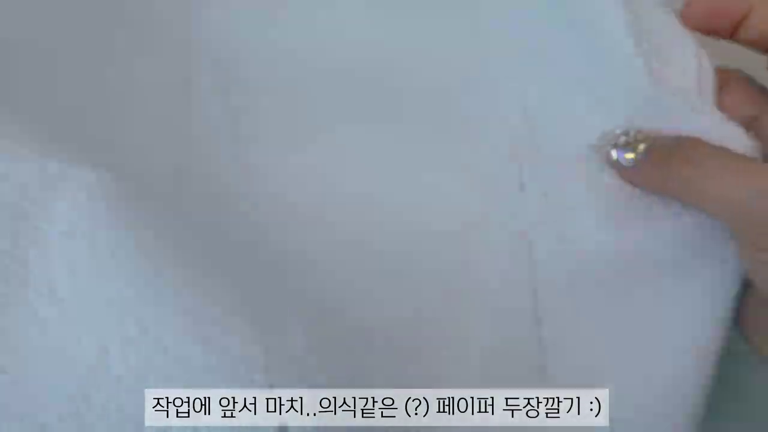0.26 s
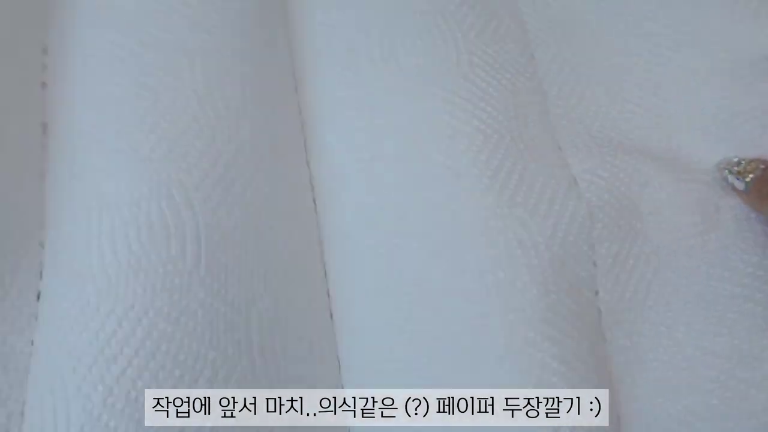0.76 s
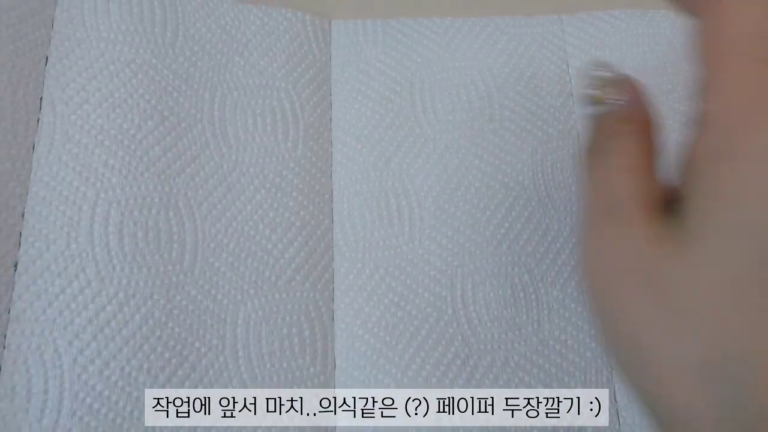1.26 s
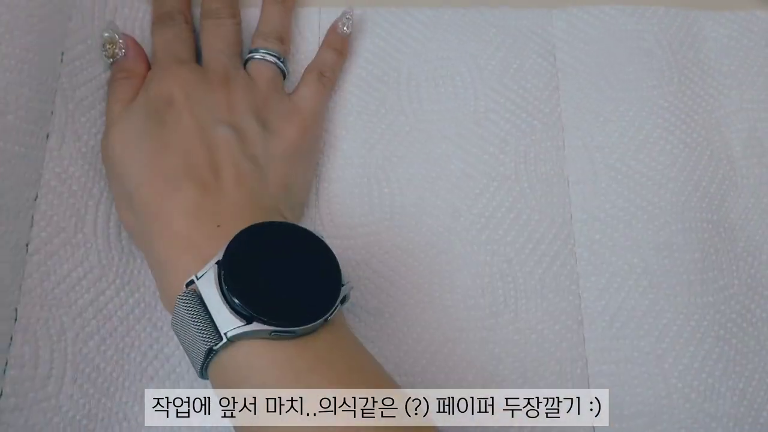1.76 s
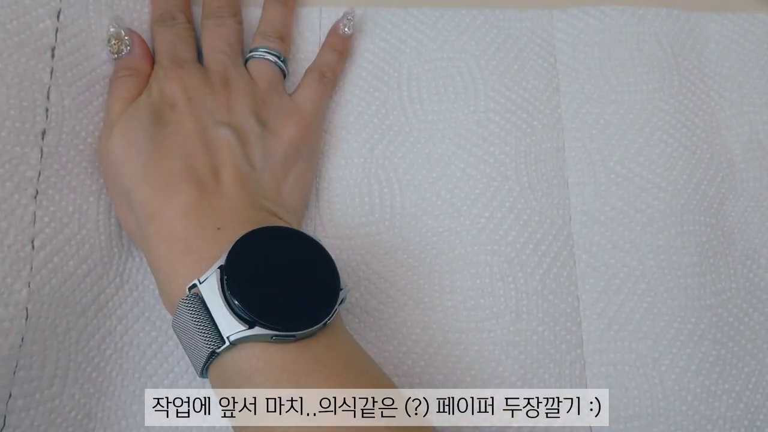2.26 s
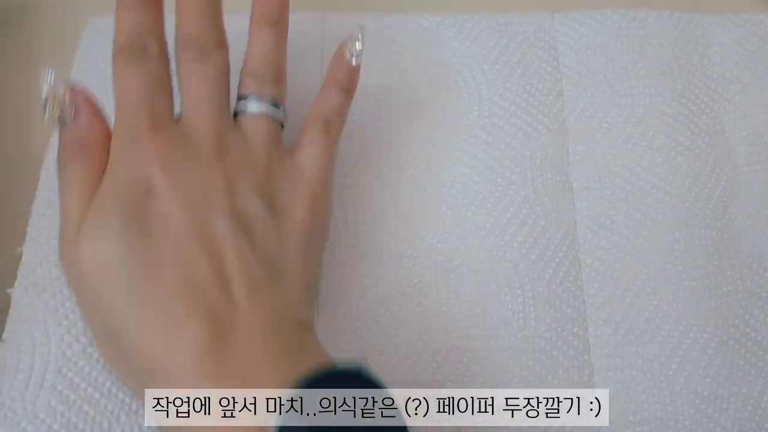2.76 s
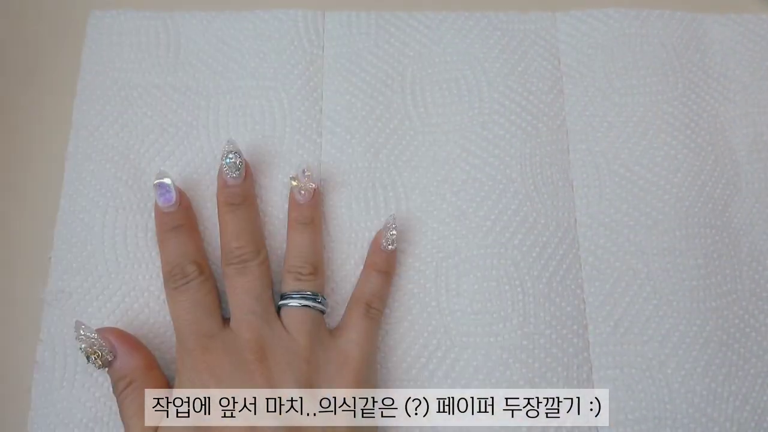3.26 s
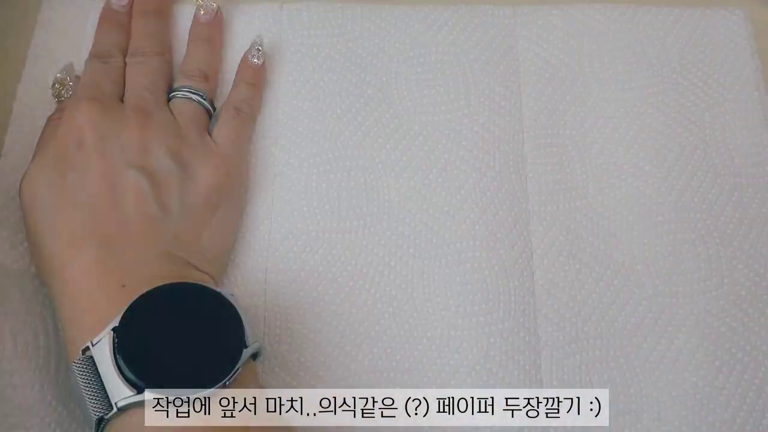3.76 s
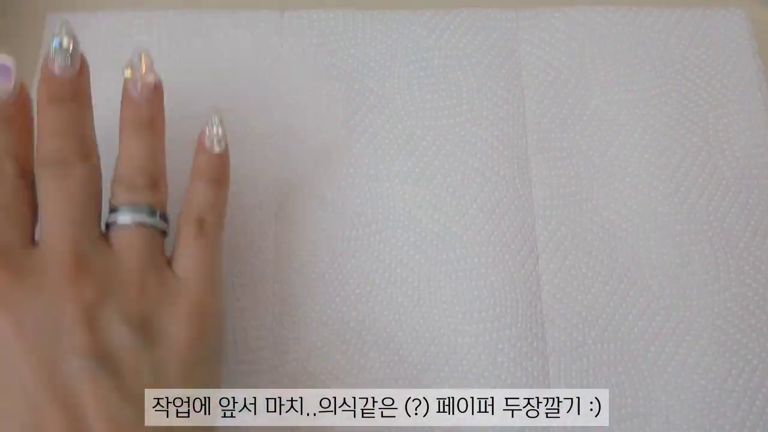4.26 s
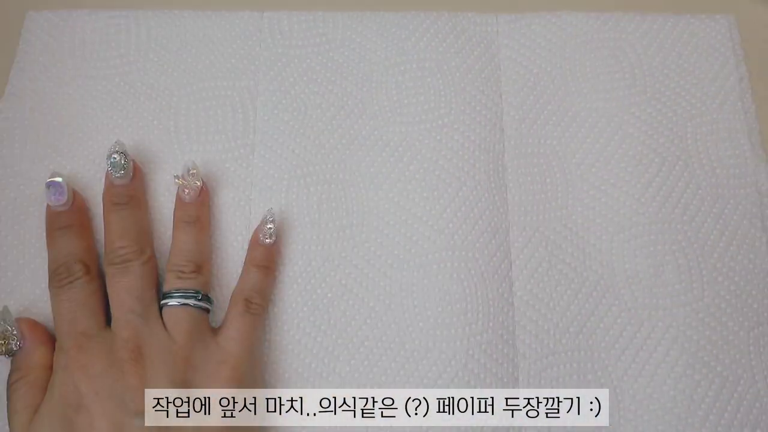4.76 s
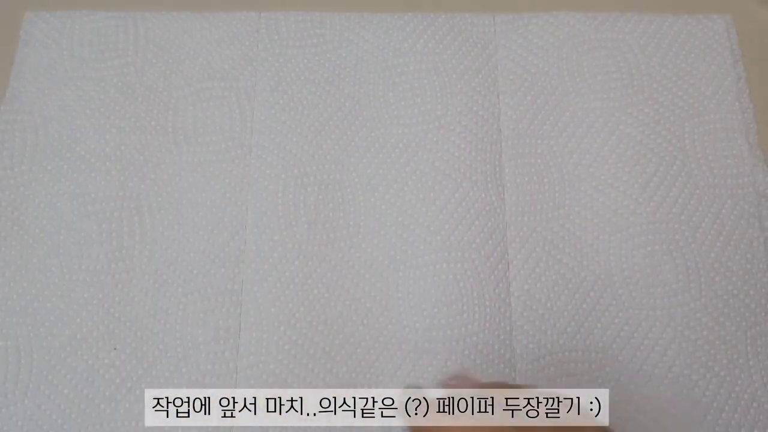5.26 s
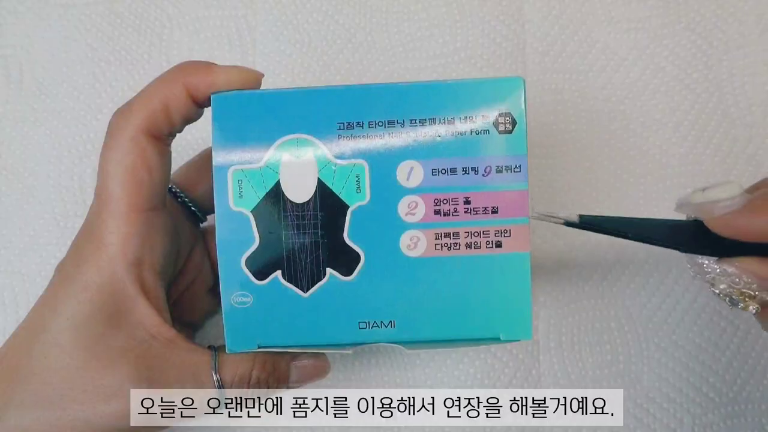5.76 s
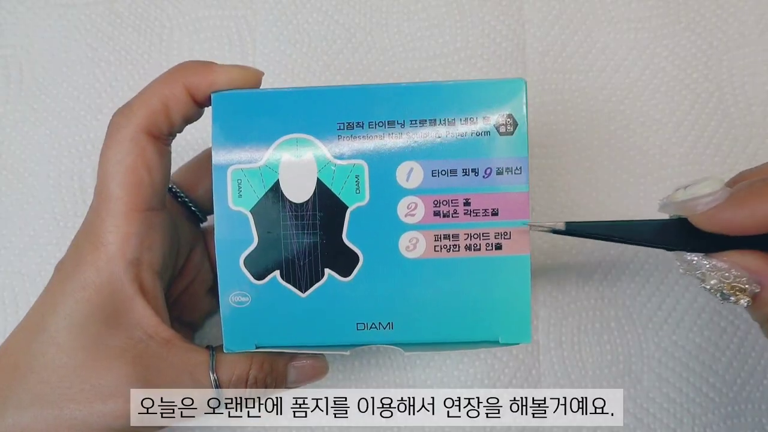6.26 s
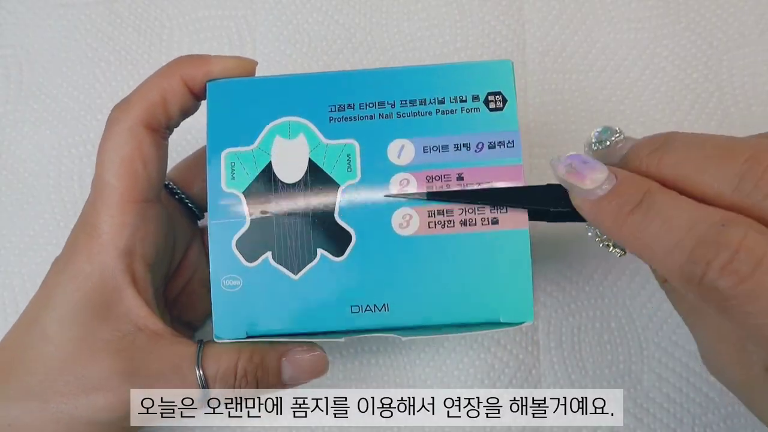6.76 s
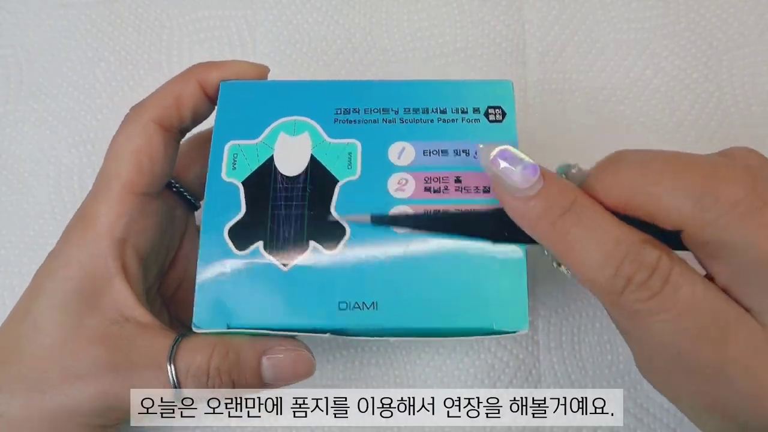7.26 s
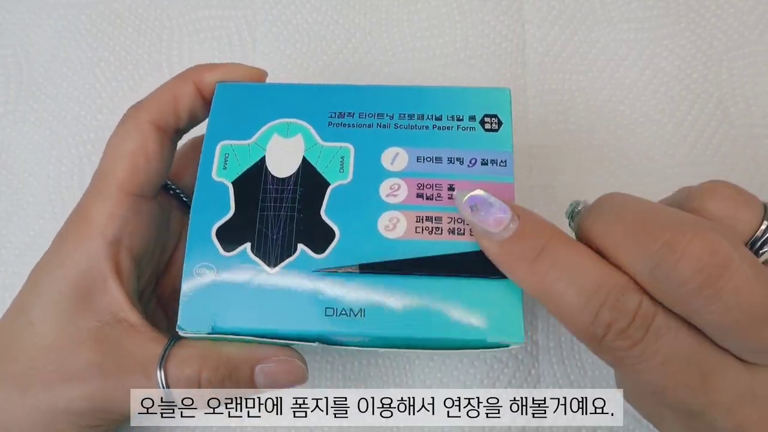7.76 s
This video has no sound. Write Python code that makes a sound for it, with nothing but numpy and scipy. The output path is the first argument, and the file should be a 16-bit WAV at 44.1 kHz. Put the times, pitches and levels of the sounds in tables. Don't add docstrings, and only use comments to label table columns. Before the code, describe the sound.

Very close to the microphone, embossed paper towel rustles and slides, quietens, then crackles in a rapid burst of snaps. Smaller snaps, a palm thump and a cluster of nail pats on the desk follow. After a near-silent gap, steel tweezers tap and scratch a hollow cardboard box, ending with its flap sliding. Small quiet room, short echoes, faint hiss.

```python
import sys
import numpy as np
from scipy import signal
from scipy.fft import rfft, irfft, next_fast_len
from scipy.io import wavfile
from scipy.ndimage import uniform_filter1d, map_coordinates

SR = 44100
rng = np.random.default_rng(int(sys.argv[2]) if len(sys.argv) > 2 else 0)


def generate_wav(sig):
    pcm = np.round(np.clip(np.atleast_2d(sig).T, -1, 1) * 32767).astype(np.int16)
    wavfile.write(sys.argv[1], SR, pcm)


def to_linear_factor(level_db):
    exponent = np.asarray(level_db, float) / 20
    return 10 ** exponent


N = 353241
TIME = np.arange(N) / SR

# f/Hz, level/dB per Hz
AIR = [(88, -61), (150, -5), (566, -9), (730, -5), (905, -8.5), (4000, -18), (13700, -24), (16000, -37)]
AIR_DB = -66.5
ROOM_T60_S, ROOM_DB = 0.31, -19
ALIKE = [.998, .91, .78, .2]
# t/s, left minus right level/dB
PAN = [(0.0, -3.5), (0.54, 1), (0.94, 9), (1.3, -2), (1.52, 6.5), (2.12, 10), (2.52, 4.5), (5.55, 7.5),
       (5.78, -1), (7.05, -3.5), (7.45, -2), (8.01, -0.5)]
# t/s, lead/samples
LEAD = [(0, -1), (1.2, -2), (1.6, 2), (5.3, 2), (5.9, 0), (8.01, 0)]

# start t/s, length/s, first level/dB, last level/dB, brightness/dB
SLIDES = [(0, 0.16, -33.5, -39.5, -1), (.105, 0.031, -33, -33, 0), (.145, 0.079, -37, -36.5, -1.5),
          (.24, 0.16, -37, -38, -0.5), (.425, 0.13, -30, -30.5, 2), (.47, 0.04, -35.5, -29, 0.5),
          (.56, 0.057, -36.5, -40.5, -0.5), (.63, 0.12, -33, -42.5, 0.2), (.76, 0.082, -38, -37, -1.5),
          (.85, 0.057, -38.5, -41.5, 1), (.915, 0.053, -39.5, -44, -0.5), (.985, 0.34, -48.5, -51, -2.5),
          (1.42, 0.14, -57.5, -49, 1), (1.575, 0.075, -55, -59, 5), (1.72, 0.057, -71.5, -57.5, 2.5),
          (1.915, 0.11, -48.5, -41.5, 1), (2.04, 0.14, -46, -45.5, 1), (2.19, 0.092, -55, -59, 3),
          (2.48, 0.067, -71, -58.5, -1.7), (3.68, 0.11, -55, -41, -1), (3.87, 0.044, -41, -44, 0),
          (4.48, 0.08, -65, -41.5, 3.5), (4.94, 0.12, -58, -63.5, 1.3), (5.362, .04, -52.5, -42.5, 4.5),
          (5.41, 0.07, -41, -43.5, 7.5), (5.5, 0.12, -54.5, -71, 8)]
# start t/s, length/s, first level/dB, last level/dB
SETTLES = [(2.28, 0.17, -61, -57), (2.565, 0.066, -22.5, -26.5), (2.74, 0.12, -40.5, -47),
           (2.92, 0.13, -49.5, -52.5), (3.115, 0.13, -41, -47), (3.236, 0.0055, -30, -33.5),
           (3.25, 0.14, -40, -47), (3.41, 0.065, -42, -51), (3.52, 0.43, -51.5, -58.5),
           (3.9, 0.17, -37, -59.5), (4.59, 0.06, -43, -59.5), (4.68, 0.097, -46.5, -64),
           (4.79, 0.14, -46, -68)]
# start t/s, length/s, first level/dB, last level/dB
FLICK = [
    (1.24, 0.02, -46, -29),
]
# t/s, peak level/dB, desk knock against peak/dB, brightness/dB, knock f/Hz
SNAPS = [(2.5433, -15.5, -8.5, 1, 1180), (2.5551, -6.5, -9, -18.5, 1000), (2.5614, -11, 3.5, 1.5, 490),
         (2.5714, -17.5, -17.5, 4, 1200), (2.5782, -14, 2.5, -7, 730), (2.6297, -16, 1, -1, 526),
         (2.6389, -9.5, 4.5, -3.5, 1040), (2.6682, -11.5, -9.5, -3, 1250), (2.6861, -19, 6.5, 2, 710),
         (2.7058, -15, 2, -3, 710), (2.7224, -20, 3, -19.5, 839), (3.2135, -9, -9, -12.5, 1210),
         (3.2303, -10.5, -13.5, -12.5, 850), (3.237, -19.5, -2.5, 1.5, 816), (3.7534, -25.5, -29, -3, 847),
         (3.7708, -21.5, -12, -2, 1190), (3.8043, -17, -6.5, -4.5, 790), (3.8448, -19, 1.5, 4.5, 1209),
         (3.8616, -13.5, 1.5, 3, 438), (3.8715, -13.5, 1.5, -0.5, 557), (3.8916, -21.5, 4.5, -5, 720)]
# t/s, peak level/dB, desk knock against peak/dB, brightness/dB, knock f/Hz
PATS = [(.625, -22.5, -12, -14, 1070), (2.9135, -39.5, 5, -27, 550), (3.109, -28, 6, -6, 438.8),
        (3.1287, -37.5, -25, 2, 649.3), (3.2897, -28, -8, -1.5, 400), (3.3431, -36, 0.5, -6, 640),
        (4.5693, -22.5, -2, -9.5, 462), (4.584, -12, -8, -29.5, 580), (4.6651, -9.5, -11, -49.5, 650),
        (4.7109, -12, -5.5, -23.5, 460), (4.7655, -18, -7, -19.5, 437), (4.7718, -18, -3, -7, 450),
        (4.7893, -30.5, -16, -2, 529)]
# t/s, peak level/dB, f/Hz
CREASES = [
    (0.2257, -23.5, 860),
    (0.832, -27, 604.8),
    (1.0283, -32.5, 1024),
    (2.2615, -46, 794),
    (2.3328, -48, 985),
    (2.435, -45.5, 1082),
]
# t/s, pitch ratio
TENSION = [(0, 1.014), (.6, 1.053), (.74, 0.81), (0.859, 0.72), (0.919, 0.87), (1.2, 1.07), (1.499, 1.04),
           (2.001, 0.9), (2.5, 1.03)]
# f/Hz, width/Hz, level/dB
SHEET = [
    [(520, 560, 0), (734, 200, 7), (1100, 300, 4)],
    [(1460, 890, 8), (2280, 1300, 8.5)],
    [(3300, 850, 4.5), (4400, 770, 4)],
    [(7000, 17000, 10.5), (10230, 7100, -4), (14290, 2400, -6.5)],
]
# f/Hz, width/Hz, level/dB
DESK = [
    [(450, 303, 0.0031), (672.6, 35, 0.0023)],
    [(1210, 500, 1), (1750, 830, -2.5)],
    [(2680, 1300, 4.6), (5000, 1500, 5)],
    [(6730, 16000, -0.67), (11600, 1000, -1.4)],
]

# start t/s, length/s, first level/dB, last level/dB, brightness/dB
LEANS = [(0, 0.28, -50, -56, 2), (.42, 1.01, -51.5, -57, 1), (1.7, 1.1, -54, -55.5, 2.5),
         (2.55, 0.26, -42, -61, 2), (3.11, 0.4, -49, -55.5, 6), (3.28, 0.54, -58.5, -55, -2.5),
         (3.8, 0.21, -49.5, -51.5, 1.5), (4.05, 0.49, -75.5, -63.5, 0.5), (4.56, 0.17, -55, -44.5, 3),
         (4.9, 0.38, -66, -69, -4.5), (5.3, 0.46, -53.5, -56.5, -5.5), (5.85, 0.34, -62, -74, -3),
         (6.3, 1.3, -70.5, -58, 1.5), (7.4, 0.82, -60.5, -59, 1)]
# start t/s, length/s, first level/dB, last level/dB
DRUMS = [
    (.46, 0.048, -68, -49),
    (1.25, 0.074, -54, -42),
    (1.85, 0.069, -58.5, -48),
    (6.43, 0.13, -61, -56.5),
    (7.53, 0.053, -50, -49),
]
# t/s, peak level/dB, f/Hz, ring/s
LANDINGS = [
    (3.106, -36, 317, 0.023),
    (3.118, -22.5, 63.7, 0.012),
    (3.12, -32, 205, .04),
    (3.135, -41.5, 305, 0.033),
    (3.41, -39, 265, 0.011),
    (3.417, -32, 139.3, 0.012),
    (3.869, -32.5, 307.6, 0.013),
    (4.576, -33, 206, 0.023),
    (7.236, -41.5, 239, 0.018),
    (7.531, -31, 228, 0.012),
]

# start t/s, length/s, first level/dB, last level/dB, brightness/dB
PULLS = [
    (1.48, 0.042, -55, -54, -14),
    (3.52, 0.058, -54, -55, -4.5),
    (3.6, 0.16, -55.5, -47, -13.5),
    (3.92, 0.046, -41, -52, -14.5),
    (3.415, 0.021, -51, -58, -3),
    (4.59, 0.044, -52, -49, -14),
    (4.675, 0.029, -51, -50, -22),
    (4.72, 0.033, -37.5, -52, -17),
]
# start t/s, length/s, first level/dB, last level/dB
BRUSHES = [
    (3.97, 0.039, -50, -51),
    (4.19, 0.058, -72.5, -71),
    (4.245, 0.014, -62, -66),
    (4.29, 0.012, -63.5, -75),
]
# t/s, peak level/dB, f/Hz, ring/s
PINGS = [(.833, -30.5, 3200, .004), (.836, -26.5, 584, 0.0049), (1.028, -32, 2470, .002),
         (2.5565, -20, 2384, 0.00054), (2.5705, -14.5, 2340, 0.0014), (2.6682, -7, 1189, 0.0019),
         (2.7058, -7.5, 990, 0.0024), (2.7224, -10.5, 1130, 0.002), (3.1083, -33, 3165, 0.0018),
         (3.1283, -31, 3970, 0.0015), (3.1752, -35.5, 2500, .002), (3.2295, -18, 1767, 0.0014),
         (3.2894, -29, 3120, 0.0038), (3.3473, -35, 2760, 0.0044), (3.4051, -36, 2020, 0.0025),
         (3.417, -35.5, 685.5, 0.012), (3.42, -29, 480, 0.0061), (3.665, -45, 400, .006),
         (3.7722, -18.5, 2567, 0.001), (3.862, -9, 2010, .0004), (3.83, -36.5, 2200, .001),
         (4.584, -17, 1999, 0.0014), (5.9085, -41, 384, 0.0073), (6.1305, -36.5, 772, 0.006),
         (6.009, -46, 2750, 0.0028), (6.299, -48, 800, 0.0016), (6.314, -42.5, 400, 0.011),
         (7.827, -27.5, 443, 0.0058), (3.231, -16.5, 450, 0.0026), (3.347, -38.5, 1278, .003),
         (6.852, -17, 3108, .0025), (6.852, -26, 4800, .002), (6.896, -26.5, 1530, 0.0039),
         (6.513, -28.5, 1000, 0.013), (6.54, -26, 2750, 0.0038), (6.72, -35, 880, .005),
         (6.775, -38.5, 1535, .012), (5.434, -41, 1999, 0.011), (6.8518, -17, 1484, 0.0062),
         (7.012, -34.5, 384.6, 0.005), (7.058, -54, 4820, .008), (7.159, -52, 2870, 0.0016),
         (7.308, -34.5, 1560, 0.0019), (7.321, -17.5, 1690, 0.0021), (7.3215, -14.5, 2360, .0008),
         (7.2583, -13, 2200, .0004), (7.2461, -20, 2690, 0.0004), (4.5698, -23, 2200, 0.0011),
         (7.412, -27.5, 3300, 0.0056), (7.4435, -12.5, 1630, 0.0043), (7.532, -15, 800, 0.0063),
         (7.53, -14, 2280, 0.0021), (7.868, -40, 2660, 0.0018), (7.9185, -11, 1760, 0.0065),
         (7.9185, -12, 4310, 0.0025)]
# f/Hz, width/Hz, level/dB
TAUT = [
    [(736, 37, 2), (1250, 72, -8)],
    [(2750, 200, 7), (3500, 790, -3.5)],
]
# f/Hz, width/Hz, level/dB
EMBOSSING = [
    [(740, 200, 0)],
    [(1840, 250, 0.94), (2260, 850, -1.1), (2630, 340, -1)],
]

# t/s, peak level/dB, hollow sound against peak/dB, brightness/dB, hollow f/Hz
TAPS = [(5.9077, -33, 1, -3.5, 1000), (6.0064, -46.5, 8.5, -9, 884), (6.1295, -36.5, -3, -16, 753),
        (6.3131, -35.5, 3.5, -14.5, 1000), (6.386, -44, -7, -4, 750), (6.8512, -16, -17, -7.5, 1040),
        (6.8951, -31.5, -1.5, 5, 1250), (6.9048, -19.5, -8, 1.5, 1250), (7.2368, -29.5, 4, -11, 450),
        (7.2456, -20, -7, -12, 900), (7.2573, -18, -2, -4.5, 1000), (7.321, -16, -14, -22, 790),
        (7.4414, -16, -16, -9, 810), (7.5291, -0.34, -9, -8, 917), (7.5439, -12.5, -8, -7, 774),
        (7.8274, -19.5, -9, -1, 350), (7.9183, -3.5, -14, 0.4, 1010), (7.9958, -26.5, -9, 1.5, 820)]
# start t/s, length/s, first level/dB, last level/dB, brightness/dB
DRAG = [
    (6.47, 0.034, -41.5, -45, -1.5),
    (6.511, 0.0117, -30.5, -34.5, -1.5),
    (6.541, 0.03, -30.5, -35, 3),
    (6.575, .105, -35.5, -39.5, 3.5),
    (6.69, 0.0347, -40.5, -32, 1),
    (6.76, 0.03, -43.5, -42, -1.5),
]
# start t/s, length/s, first level/dB, last level/dB, brightness/dB
SCRAPES = [(6.34, .09, -54, -58, -2), (6.93, 0.049, -61, -48, 0.5), (6.98, 0.028, -53, -37.5, 0.4),
           (7.03, 0.123, -57.5, -56, -1), (7.19, 0.028, -48, -43.5, -1.5), (7.275, 0.043, -58, -42, -0.5),
           (7.335, 0.053, -36.5, -45.5, 0), (7.41, .03, -34.5, -31.5, 2), (7.455, 0.085, -25.5, -40, 0.3),
           (7.555, 0.04, -38, -40.5, 5), (7.59, 0.07, -36, -36, 4.5)]
# start t/s, length/s, first level/dB, last level/dB, brightness/dB
LID = [
    (7.73, 0.039, -39, -30.5, 4.5),
    (7.772, .03, -28.5, -23.5, 5.5),
    (7.808, 0.012, -22.5, -18, 4.5),
    (7.85, 0.083, -47.5, -49, 2),
    (7.93, .085, -29.5, -41, 1.2),
]
# t/s, pitch ratio
SAG = [(6.5, 0.99), (6.619, 0.98), (6.729, .95), (6.78, 0.98)]
# f/Hz, width/Hz, level/dB
BOX = [
    [(400, 90, -2), (800, 115, -3.5), (1000, 48, 1)],
    [(1672, 220, 1.9), (2200, 390, -1.5), (2670, 430, 0.3)],
    [(3267, 380, -1), (3900, 310, -6.5), (4500, 510, -1), (4780, 390, -6.5)],
    [(6100, 700, -1), (6460, 1100, -11), (7750, 900, -4), (10400, 5000, -11)],
]
# f/Hz, width/Hz, level/dB
DRAG_BODY = [
    [(399, 72, -6), (985, 107, -1.5), (1310, 57, -8)],
    [(1685, 200, -1), (2290, 750, -6), (2730, 260, -1)],
    [(3300, 370, 3.5), (4340, 180, 5.5), (5140, 640, -5)],
    [(5790, 240, -3.5), (6290, 160, 4), (7270, 300, -4.5), (8100, 610, -11.5), (10300, 5400, -20)],
]
# f/Hz, width/Hz, level/dB
POKE_BODY = [
    [(400, 140, -1), (800, 180, -1), (985, 150, -7)],
    [(1584, 410, -1.5), (2130, 160, -5), (2450, 160, -3.5), (2910, 330, -7)],
    [(3470, 220, -0.5), (4460, 680, -8)],
    [(5820, 260, 4), (7317, 2300, -15), (10400, 5000, -15)],
]
# f/Hz, width/Hz, level/dB
LID_BODY = [
    [(422, 160, -7.5), (1010, 210, 2)],
    [(1653, 157, -3.5), (2270, 400, -8.5)],
    [(3280, 480, 0), (3860, 470, -0.5), (4410, 150, 4), (4900, 270, -5)],
    [(5500, 350, 0), (5970, 300, 1), (6620, 460, -11), (9800, 5000, -15.5)],
]


def unit(x):
    return x / np.sqrt(np.mean(x ** 2))


def ring(x, modes, spread=False):
    size = next_fast_len(x.shape[-1], True)
    f = np.fft.rfftfreq(size, 1 / SR) + 1e-3
    tuned = [(to_linear_factor(db), (f - hz ** 2 / f) / (1.55 * width)) for hz, width, db in modes]
    if spread:
        response = np.sqrt(sum((gain / (1 + off * off)) ** 2 for gain, off in tuned))
    else:
        response = sum(gain / (1 + 1j * off) ** 2 for gain, off in tuned)
    return irfft(rfft(x, size) * response, size)[..., :x.shape[-1]]


def walk(rate):
    hold = int(SR / rate)
    steps = np.repeat(rng.standard_normal(N // hold + 1), hold)
    return unit(uniform_filter1d(steps, hold)[:N])


def grit(spread_db, flicker_db, rate, channels=1):
    slips = rng.standard_normal((channels, N))
    slips *= to_linear_factor(spread_db * rng.exponential(size=(channels, N)))
    return np.squeeze(slips * to_linear_factor(flicker_db * walk(rate)))


def ports(bands):
    sign = np.array([[1], [-1]])
    out = 0
    for band, alike in zip(bands, np.clip(ALIKE, 0, 1)):
        out = out + np.sqrt((1 + alike) / 2) * band[0] + sign * np.sqrt((1 - alike) / 2) * band[1]
    return out


def strokes(table, colour_db, tilt, attack_db_s, release_db_s):
    power = np.zeros((len(colour_db), N))
    rise, fall = 60 / attack_db_s, 60 / release_db_s
    for s, length, first_db, last_db, *bright_db in table:
        end = s + max(length, .002)
        span = slice(max(int((s - rise) * SR), 0), int((end + fall) * SR))
        db = np.interp(TIME[span], [s - rise, s, end, end + fall],
                       [first_db - 60, first_db, last_db, last_db - 60])
        group_db = np.add(colour_db, sum(bright_db) * np.array(tilt))
        power[:, span] += np.outer(to_linear_factor(group_db), to_linear_factor(db)) ** 2
    return np.sqrt(power)


def friction(gains, body, slips, patchy_db, rate, bend=((0, 1), (9, 1)), count=0):
    out, busy = np.zeros((2, N)), np.flatnonzero(gains[0])
    span = slice(busy[0], busy[-1])

    def shake(mode):
        patches = to_linear_factor(patchy_db * walk(rate)[span])
        flips = rng.choice([-1., 1.], N)[span]
        return patches * ring(slips[:, span] * flips, [mode], spread=True)

    bands = [unit(sum(map(shake, modes))) for modes in body]
    spot = np.cumsum(np.interp(TIME[span], *np.transpose(bend)))
    for k, band in enumerate(bands[:count]):
        bands[k] = np.array([map_coordinates(row, [spot], mode="mirror") for row in band])
    out[:, span] = ports([gain[span] * band for gain, band in zip(gains, bands)])
    return out


def blows(table, top_db, follow):
    return [(s, db, low_db, bright_db, top_db + follow * bright_db, hz) for s, db, low_db, bright_db, hz in table]


def hits(table, body, crack_s, tail_s, tail_db, late_s, detune, damping):
    out, t = np.zeros((2, N + 4096)), np.arange(4096) / SR
    for s, db, low_db, edge_db, top_db, note_hz in table:
        noise = rng.standard_normal((2, len(t)))
        spot = 1 + detune * rng.standard_normal(size=12)
        bands = []
        for group, (modes, rel_db) in enumerate(zip(body, (low_db, 0, edge_db, top_db))):
            crack = np.exp(-t / crack_s[group])
            tail = to_linear_factor(tail_db[group]) * np.exp(-t / tail_s[group])
            push = noise * (crack + tail)
            push *= 1 - np.exp(-t / 0.00026)
            push[0, 8] += 4.26 / 1.5 ** group
            modes = [(hz * spot[2 * group + k], width, gain) for k, (hz, width, gain) in enumerate(modes)]
            if group == 0:
                modes.append((note_hz, damping * note_hz, 5.5))
            y = np.roll(ring(push, modes), int(SR * late_s / 4 ** group), axis=1)
            bands.append(y * to_linear_factor(db + rel_db) / np.abs(y).max(axis=1, keepdims=True))
        i = int(s * SR)
        out[:, i:i + len(t)] += ports(bands)
    return out[:, :N]


def dying_notes(table):
    out, t = np.zeros(N + 8192), np.arange(8192) / SR
    for s, db, hz, ring_s in table:
        i = int(s * SR)
        out[i:i + len(t)] += to_linear_factor(db) * np.sin(2 * np.pi * hz * t) * np.exp(-t / max(ring_s, 1e-4))
    return out[:N]


def towel():
    slips = grit(2.8, 1.4, 60, channels=2)
    slide = strokes(SLIDES, (-3.5, -4.5, -13.0, -4.5), (-1.5, -0.3, 0.43, 0.98), 930, 770)
    settle = strokes(SETTLES, (-5.5, -17, -21, -10.0), 0, 560, 270)
    flick = strokes(FLICK, (-9, -10.0, 2.1, -23.0), 0, 500, 1030)
    gains = np.sqrt(slide ** 2 + settle ** 2 + flick ** 2)
    rub = friction(gains, SHEET, slips, 3.8, 11, TENSION, count=1)
    creases = [(s, db, -7, -5, -14, hz) for s, db, hz in CREASES]
    knocks = blows(SNAPS, -5.0, 0.25) + blows(PATS, -9.0, 0.2) + creases
    return rub + hits(knocks, DESK, crack_s=(.0006, .0007, .001, .0016), tail_s=(0.017, 0.0092, 0.0055, 0.022),
                      tail_db=(-17.0, -23.5, 1.5, -10.5), late_s=.0011, detune=0.26, damping=.22)


def desk():
    lean = strokes(LEANS, (-1.5, -9, -1.5), (-1.1, .1, 1.1), 600, 103)
    hum = strokes(DRUMS, (0,), 0, 180, 175)[0]
    sway = ring(ring(grit(.1, 1.9, 20), [(55.3, 29, 0)]), [(51, 59, 0)])
    drum_hz = 98 * (1 + 0.024 * walk(6.0))
    drum = np.sin(2 * np.pi * np.cumsum(drum_hz) / SR) * to_linear_factor(1.5 * walk(10))
    overtone = ring(ring(grit(0.043, 2.9, 21), [(136.0, 28, 0), (189, 96, -2.0)]), [(143.6, 46.6, 0)])
    out = lean[0] * unit(sway) + (lean[1] + hum) * unit(drum) + lean[2] * unit(overtone)
    return out + dying_notes(LANDINGS)


def air():
    hz = np.fft.rfftfreq(N, 1 / SR) + 1
    curve_hz, curve_db = np.transpose(AIR)
    shape = to_linear_factor(np.interp(np.log(hz), np.log(curve_hz), curve_db))
    width = [hz ** 0, np.minimum(hz / 5000, 1)]
    mid, side = irfft(rfft(rng.standard_normal((2, N))) * shape * width, N)
    return to_linear_factor(AIR_DB) * np.array([mid + side, mid - side]) / np.std(mid)


def fingertips():
    slips = grit(2.5, 2.0, 50, channels=2)
    hum = friction(strokes(PULLS, (0, -6), (0, 1), 420, 300), TAUT, slips, 1.1, 20)
    brush = friction(strokes(BRUSHES, (-11, 0.2), 0, 300, 350), EMBOSSING, slips, 2.3, 30)
    return hum + brush + dying_notes(PINGS)


def box():
    slips = grit(2.5, 1.8, 70, channels=2)

    def scrape(table, colour_db):
        return strokes(table, colour_db, (-1.65, 0.21, 1.08, 1.95), 1300, 980)

    drag = friction(scrape(DRAG, (-1.5, -6, -11.5, -10.5)), DRAG_BODY, slips, 2.6, 25, SAG, count=4)
    taps = hits(blows(TAPS, -13.0, 0.53), BOX, crack_s=(.0006, .0008, .001, .0012),
                tail_s=(0.0043, 0.0079, 0.0072, 0.0095), tail_db=(-8.0, -14.5, -23.0, 4.0),
                late_s=0.0016, detune=0.048, damping=.09)
    pokes = friction(scrape(SCRAPES, (-6.0, -3.5, -9.5, -13.0)), POKE_BODY, slips, 3.6, 25)
    lid = friction(scrape(LID, (-4.5, -5, -6.5, -15.5)), LID_BODY, slips, 2.2, 30)
    return drag + taps + pokes + lid


def place(x):
    pan_db = np.interp(TIME, *np.transpose(PAN)) * np.array([[1], [-1]]) / 2
    middle = signal.lfilter(*signal.butter(1, [800, 2800], "band", fs=SR), x)
    x = x + middle * (to_linear_factor(pan_db) - 1)
    late = np.arange(N) - np.round(np.interp(TIME, *np.transpose(LEAD))).astype(int)
    return np.array([x[0], x[1, np.clip(late, 0, N - 1)]])


def room(x):
    t = np.arange(SR // 2) / SR
    decay = np.exp(-np.log(1000) * t / ROOM_T60_S) * (t > .005)
    tail = rng.standard_normal((2, len(t))) * decay
    treble = signal.lfilter(*signal.butter(2, 1200, "high", fs=SR), tail[1])
    apart = .6 * treble * np.array([[1], [-1]])
    tail = signal.lfilter([1], [1, -.75], tail[0] + apart)
    return to_linear_factor(ROOM_DB) * signal.fftconvolve(x, tail / np.sqrt(np.sum(tail[0] ** 2)), axes=1)[:, :N]


def scene():
    hands = place(towel() + box() + fingertips())
    return hands + room(hands) + desk() + air()


def roll_off(x):
    return signal.sosfilt(signal.butter(12, 15650, fs=SR, output="sos"), x)


def record(dry):
    mix = np.clip(dry, -.92, .92)
    return roll_off(mix)


dry = scene()
out = record(dry)
generate_wav(out)
```